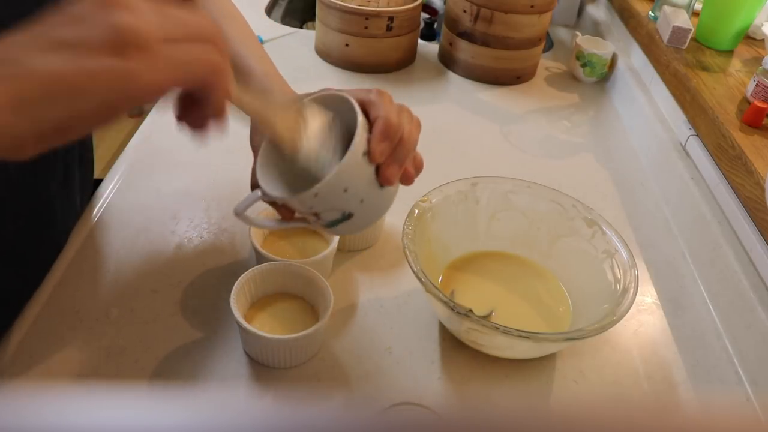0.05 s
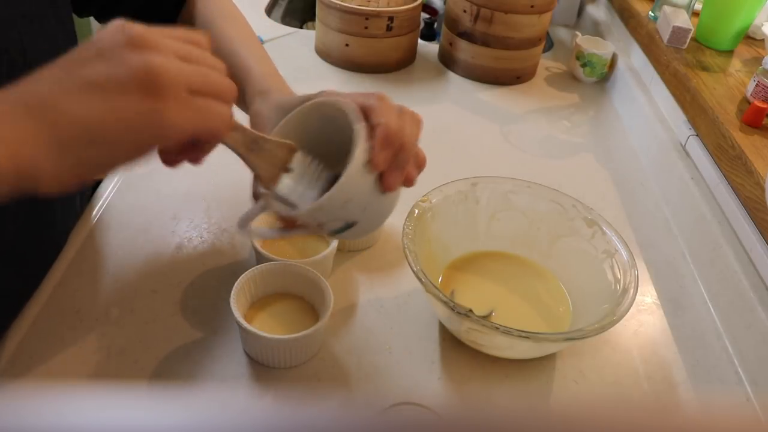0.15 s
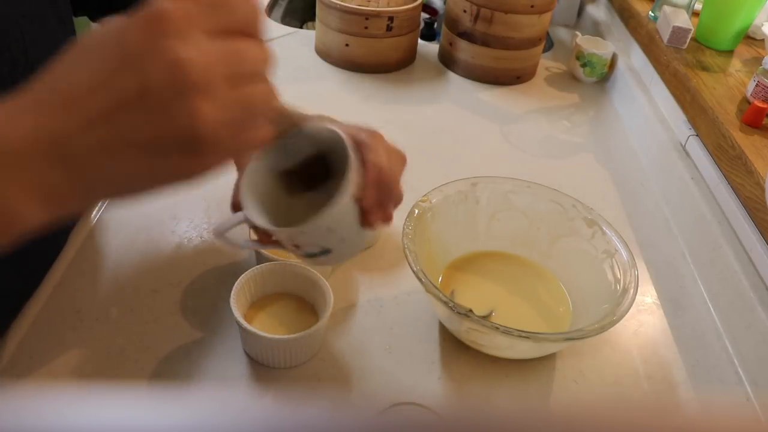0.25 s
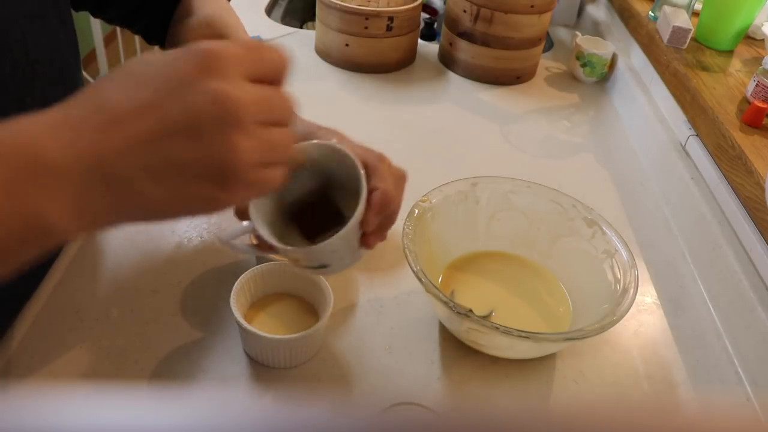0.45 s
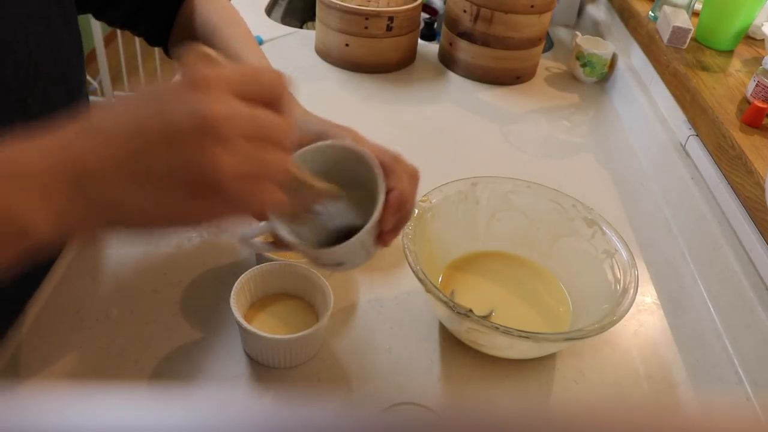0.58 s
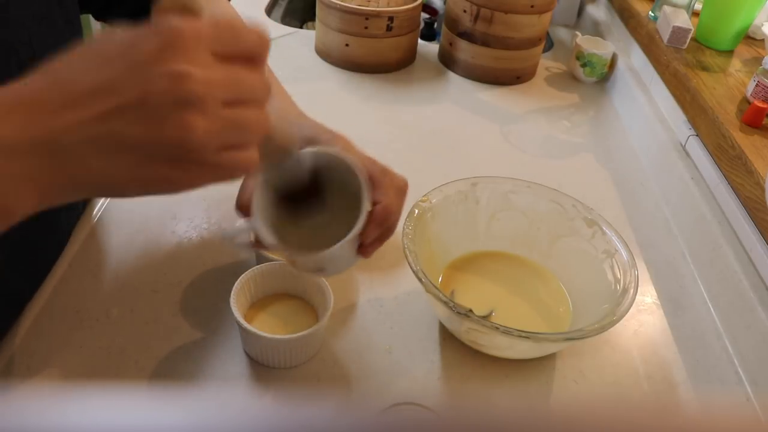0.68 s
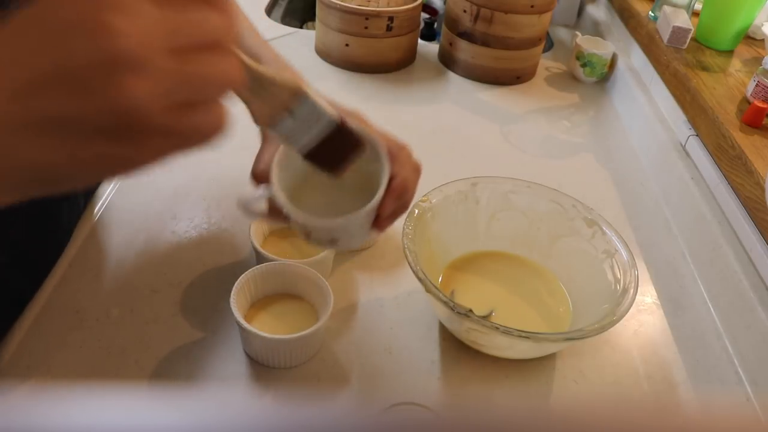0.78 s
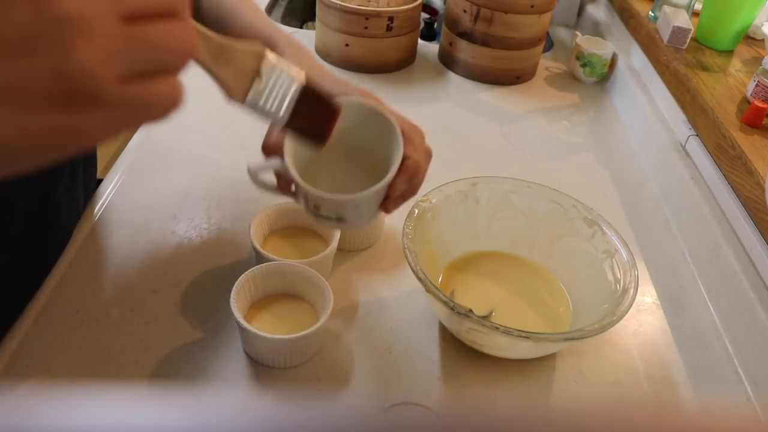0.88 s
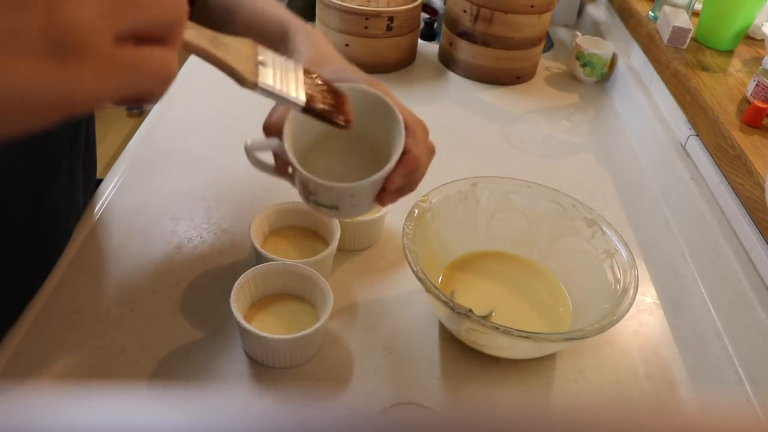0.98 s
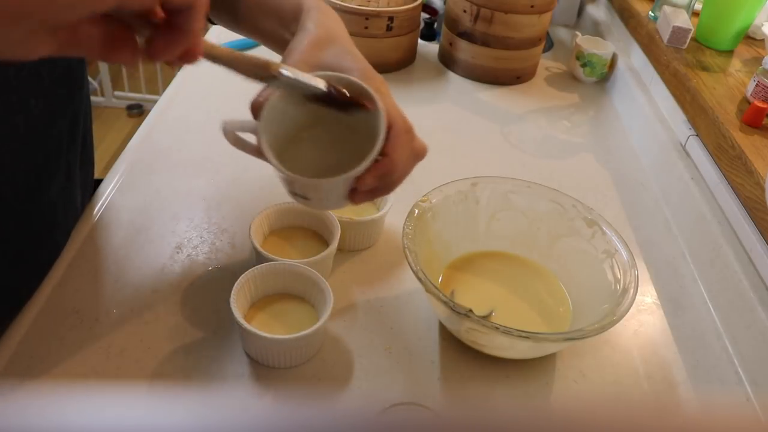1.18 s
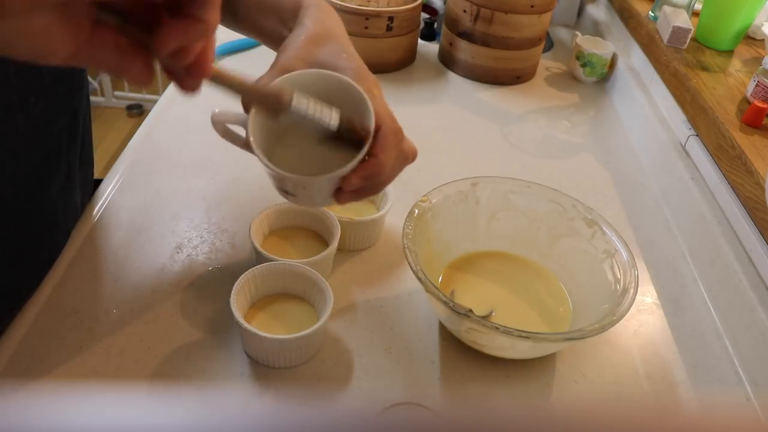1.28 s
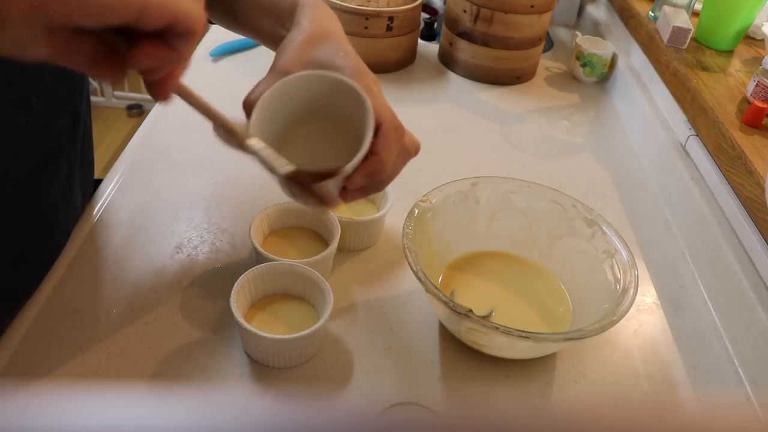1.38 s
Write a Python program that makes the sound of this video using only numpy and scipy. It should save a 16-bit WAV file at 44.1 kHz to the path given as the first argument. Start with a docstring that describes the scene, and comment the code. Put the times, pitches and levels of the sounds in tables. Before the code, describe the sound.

Brisk hard clinks and bristly scrapes of a brush stirred around a hand-held ceramic mug

```python
"""A faint hum and hiss in a quiet kitchen, then a pastry brush working round inside a hand-held mug.
Its metal ferrule knocks the ceramic wall several times; the bristles scratch between the knocks.
Both excite one bank of damped modes; knocks add a noise crack, and a low thump as the hardest
overload the recorder. Feedback delays give the room's brief answer; puffs of bright noise rustle
as the brush lifts away."""
import sys
import numpy as np
from scipy import signal
from scipy.fft import rfft, irfft, next_fast_len
from scipy.io import wavfile

SR = 44100
rng = np.random.default_rng(int(sys.argv[2]) if len(sys.argv) > 2 else 0)


def log_audio(samples):
    """Write samples as a 16-bit WAV file to the path given in sys.argv[1]."""
    # one column per channel
    frames = np.atleast_2d(samples).T
    # limit to full scale, then quantise
    limited = np.clip(frames, -1, 1)
    pcm = np.round(limited * 32767).astype(np.int16)
    wavfile.write(sys.argv[1], SR, pcm)


N = 63945


def amp(db):
    """Decibel law: a level becomes an amplitude ratio."""
    return 10 ** (np.asarray(db) / 20)


def rms_one(x):
    """Power normalization: scale to unit root mean square."""
    return x / np.sqrt(np.mean(x ** 2) + 1e-20)


def at_hz(points, hz):
    """Spectral interpolation along a logarithmic frequency axis."""
    point_hz, value = np.array(points).T
    return np.interp(np.log(hz), np.log(point_hz), value)


def band(x, low_hz, high_hz):
    """Band-pass filtering with Butterworth slopes."""
    edges_hz = [low_hz, min(high_hz, .45 * SR)]
    return signal.sosfilt(signal.butter(2, edges_hz, "band", fs=SR, output="sos"), x)


def drift(rate_hz):
    """Low-passed noise: a slow random fluctuation of unit spread."""
    r = np.exp(-2 * np.pi * rate_hz / SR)
    noise = rng.standard_normal(N + SR)
    return rms_one(signal.lfilter([1], [1, -2 * r, r * r], noise)[SR:])


def sides(db):
    """Level stereophony: left and right gains for a level difference."""
    return amp(np.array([db, -db]) / 2)


FLOOR_DB = -52  # rms level of the noise floor
RUMBLE_SWING_DB, RUMBLE_TOP_HZ = 2.5, 150  # the bass comes in lumps
# noise floor spectrum: pitch_hz [Hz], level_db [relative dB per Hz]
FLOOR = [(15, -22.5), (30, -2.5), (62, -0.5), (100, -6.5), (200, -12), (400, -10), (900, -17), (2500, -20),
         (4800, -25), (6800, -24), (10000, -19.5), (14000, -34), (16000, -30.5)]
# left-right likeness of the noise: pitch_hz [Hz], likeness [0 to 1]
LIKENESS = [(30, .9), (120, 0.51), (400, 0.75), (1500, .15), (5000, .02)]
# hum partials: pitch_hz [Hz], level_db [dB, before a common lift and wavering]
HUM = [(118.4, -61.5), (177.6, -64), (349.9, -69.5)]


def room_tone():
    """Partial coherence: half-octave noise bands mix mid and side; sine partials waver as hum."""
    noise = 0
    edges_hz = 20 * 2 ** np.arange(0, 10.1, .5)
    lumps = drift(11)
    white = rng.standard_normal((2, 2, N + SR))
    for k, (low_hz, high_hz) in enumerate(zip(edges_hz, edges_hz[1:])):
        mid, side = band(white[k % 2], low_hz, high_hz)[:, SR:]
        hz = np.sqrt(low_hz * high_hz)
        alike = np.clip(at_hz(LIKENESS, hz), 0, 1)
        level_db = at_hz(FLOOR, hz) + 0.701 * drift(8)
        level_db = level_db + RUMBLE_SWING_DB * (hz < RUMBLE_TOP_HZ) * lumps
        stereo = np.sqrt(1 + alike) * mid + np.sqrt(1 - alike) * side * [[1], [-1]]
        noise = noise + amp(level_db) * stereo
    hum = 0
    for hz, level_db in HUM:
        cycles = hz * np.arange(N) / SR + rng.random()
        hum = hum + amp(level_db + 0.5 + 2.5 * drift(3.2)) * np.sin(2 * np.pi * cycles)
    return amp(FLOOR_DB) * rms_one(noise) + hum


ROOM_DB, ROOM_T60_S, WALL_CUT_HZ = -22.5, 0.37, 7300


def kitchen(x):
    """Reverberation by recirculation: sixteen feedback delays a side, duller on every round."""
    size = next_fast_len(N + SR)
    one_sample = np.exp(-2j * np.pi * np.arange(size // 2 + 1) / size)
    pole = np.exp(-2 * np.pi * WALL_CUT_HZ / SR)
    dulling = (1 - pole) / (1 - pole * one_sample)
    response = np.zeros((2, len(one_sample)), complex)
    lags = (rng.uniform(.004, .035, size=32) * SR).astype(int)
    for k, lag in enumerate(lags):
        loop = amp(-60 * lag / SR / ROOM_T60_S) * dulling * one_sample ** lag
        # the closed loop sums all its rounds; signs alternate between delays
        response[k % 2] += loop / (1 - loop) * (-1) ** (k // 2)
    return irfft(response * rfft(x.mean(axis=0), size), size)[:, :N]


# faint rustles as the brush lifts away:
# start_s [s], level_db [dB at onset], t60_s [s to fall 60 dB], pitch_hz [Hz, within the band]
RUSTLES = [(0.855, -53.5, .15, 6300), (1.013, -47.5, .15, 8410), (1.011, -49.5, 0.15, 13600),
           (1.07, -59, .25, 8300)]


def rustles():
    """Exponential decay: short dying puffs of bright band-limited noise."""
    t, out = np.arange(N) / SR, 0
    for start_s, level_db, t60_s, hz in RUSTLES:
        envelope = amp(level_db - 60 * np.abs(t - start_s) / t60_s) * (t > start_s)
        puff = rms_one(band(rng.standard_normal((2, N)), hz / 1.53, hz * 1.3))
        out = out + envelope * puff
    return out


# bristles on the wall: start_s [s], then level_db [dB] in each zone of modes:
# cavity, low wall, flank, main ring, upper wall, top
SCRATCH = [(.10,-89,-82,-88,-95,-83.5,-79.5),(.135,-51,-72.5,-60,-47.5,-60.5,-51),(.19,-57,-71,-57.5,-49.5,-70.5,-63),(.21,-51,-41,-38,-50,-62,-52),
           (.245,-61.5,-46,-45,-47,-57,-53),(.27,-63,-57,-36,-50,-52,-50),(.30,-67.5,-59.5,-42.5,-33,-50.5,-39.5),(.36,-63.5,-62,-50,-41.5,-48,-53.5),
           (.40,-59.5,-51,-56,-46.5,-53.5,-51.5),(.42,-49.5,-51,-49,-37.5,-54,-47),(.455,-38,-61,-43,-38.5,-62.5,-50),(.49,-54,-40.5,-42.5,-33.5,-57.5,-55.5),
           (.52,-59.5,-50,-37,-36.5,-52,-57),(.56,-69,-56,-51,-47,-69,-48),(.61,-62,-62.5,-56.5,-39.5,-58.5,-47.5),(.64,-43.5,-42.5,-51,-46.5,-56.5,-42.5),
           (0.671,-56,-47.5,-65.5,-44,-64,-52),(0.693,-40,-37.5,-42,-26.5,-64,-47),(.71,-60.5,-54.5,-43,-45,-56,-50.5),(0.751,-56.5,-56,-46.5,-35.5,-55.5,-53.5),
           (0.764,-58,-57,-64,-56,-69,-64),(.80,-66.5,-70,-69.5,-53.5,-80,-86),(.89,-73,-85,-93,-92,-104,-92)]
FLICKS_PER_S, FLICK_SPREAD_DB, CLUMP_DB, BRISTLE_HISS_DB = 9000, 2, 2.5, -12


def bristles():
    """Stochastic friction: dense random flicks in clumps, with rubbing strength for each zone."""
    start_s, *levels_db = np.transpose(SCRATCH)
    t = np.arange(N) / SR
    rub = [amp(np.interp(t, start_s, level_db)) for level_db in levels_db]
    hits = rng.random(N) < FLICKS_PER_S / SR
    flicks = hits * amp(FLICK_SPREAD_DB * np.minimum(rng.exponential(1, N), 4))
    flicks = rms_one(flicks * amp(CLUMP_DB * drift(50)))
    upper_wall = rub[-2]
    rough = flicks * upper_wall * amp(BRISTLE_HISS_DB) * rng.standard_normal((2, N))
    return flicks, rub, band(rough, 3500, 11000)


# ferrule knocks: start_s [s], slide_ms [ms of sliding contact], then level_db [dB] in each zone:
# cavity, low wall, flank, main ring, upper wall, top; crack_db [dB], thump_db [dB], side_db [dB left-right]
KNOCKS = [(.1352,.15,-28,-25,-23.5,-24,-49.5,-62,-54,-70,-2.5),(0.2056,.2,-22.5,-14,-17,-19,-28.5,-23.5,-20.5,-70,-3),
          (0.2784,.1,-31,-11,-9.5,-16.5,-4.5,-9.5,-6,-10,6),(.4108,.1,-7.5,-7.5,-14,-7,-19,-15,1.5,-12.5,-1),
          (0.468,.3,-43,-45,-43,-17.5,-35.5,-22,-52,-73,1.5),(0.4706,5,-35.5,-40,-32,-13,-44.5,-27,-79,-72,-3),
          (.5287,.1,-30.5,-16,-11.5,-5.5,-11,-13,-2.5,-12.5,-4),(.5575,10,-63.5,-53,-50,-21.5,-53.5,-42,-76,-75,-10),
          (0.6162,.1,-9.5,-14,-20.5,-7,-13,-16.5,-1.5,-27,-2),(0.683,5,-40,-48,-23,-25.5,-34,-25,-45,-70,-1),
          (0.7187,.3,-59,-30,-56,-26.5,-36,-44,-36,-70,-4),(0.7339,2,-63,-34,-52,-49,-61,-37,-52,-70,-8),
          (1.4315,.15,-29.5,-43,-37.5,-28.5,-44,-39.5,-33,-29,-1.5)]
CRACK_TOP_HZ, CRACK_T60_S, THUMP_HZ = 7000, .005, 1300


def contact():
    """Impulse excitation: short bright cracks, and a low thump as the hardest knocks overload the recorder."""
    cracks, thumps = np.zeros((2, N))
    for start_s, *_, crack_db, thump_db, side_db in KNOCKS:
        start = int(start_s * SR)
        cracks[start], thumps[start] = amp(crack_db), amp(thump_db)
    fade = signal.lfilter([1], [1, -amp(-60 / (CRACK_T60_S * SR))], cracks)
    noise = rng.standard_normal(N) + 0.37 * rng.standard_normal((2, N))  # mostly common to both sides
    crack = band(band(fade * noise, 740, CRACK_TOP_HZ), 600, 15000)
    thump = band(thumps, 40, THUMP_HZ) * SR / (2 * np.pi * THUMP_HZ)
    return crack, thump


def ring(drive, hz, t60_s, pan_db, lead_rad):
    """Damped resonance: a complex one-pole mode heard at two ports, each with its level and phase."""
    pole = amp(-60 / (t60_s * SR)) * np.exp(2j * np.pi * hz / SR)
    turns = signal.lfilter([1], [1, -pole], drive + 1e-18)
    ports = sides(pan_db) * np.exp(.5j * lead_rad * np.array([1, -1]))
    return (turns * ports[:, None]).imag


# upper limits of the zones of modes [Hz]; the last zone is open above
ZONE_TOPS_HZ = [1800, 2600, 3050, 4000, 8000]
# mug modes: pitch_hz [Hz], level_db [dB], t60_s [s], pan_db [dB left-right], lead_rad [rad, left leads]
MUG = [(1008,-6,0.0071,-0.5,0.33),(1216,0,.02,0.5,.1),(1398,-1.5,0.018,-0.5,-0.35),(1540,-4.5,0.011,-1,-.3),(1800,-4,.006,-2.5,-0.66),(2297,-0.5,0.011,-2.5,1.2),(2640,-5,0.014,-2,.2),
       (2936,0.5,0.019,-3,.2),(3139,-6,0.026,-5,-0.14),(3207,0,0.03,-5,-0.069),(3410,-10.5,.022,-2.5,.3),(3625,-10,0.022,0,.5),(4475,-4,0.0075,-0.5,0.19),(5680,0.5,0.0096,0,-0.19),
       (6500,0.5,0.0051,3.5,.4),(6910,-4.5,.024,-1.5,.4),(7760,-7.5,.006,-1.5,.6),(8660,-4.5,.014,-0.5,.8),(9088,1,.022,-2,1.2),(10100,-9.5,.01,3,1.3),(10660,-10.5,0.0087,-3.5,1.4),(12100,-12.5,.006,0.5,0.22)]
RING_SPREAD_DB, MUG_LOW_CUT_HZ = 1.2, 780


def mug():
    """Modal superposition: knocks and flicks drive the same modes; a sliding knock swells its ring."""
    chance = rng.standard_normal((len(KNOCKS), len(MUG)))
    flicks, rub, out = bristles()  # out begins as the bristle hiss
    for k, (hz, level_db, t60_s, pan_db, lead_rad) in enumerate(MUG):
        zone = np.searchsorted(ZONE_TOPS_HZ, hz)
        # equal steady loudness whatever the damping
        damping_gain = np.sqrt(4 * np.log(1000) / (t60_s * SR))
        scratch = flicks * rng.standard_normal(N) * rub[zone] * damping_gain
        drive = scratch * np.ones((2, 1), complex)
        for (start_s, slide_ms, *levels_db, side_db), luck in zip(KNOCKS, chance[:, k]):
            n = np.arange(max(int(slide_ms * SR / 1000), 1))
            strength = (-1) ** k * amp(levels_db[zone] + RING_SPREAD_DB * luck)
            # the push turns in step with the mode, so the ring builds up
            push = strength * np.exp(2j * np.pi * hz * n / SR) / len(n)
            drive[:, int(start_s * SR) + n] += push * sides(side_db)[:, None]
        out += amp(level_db) * ring(drive, hz, t60_s, pan_db, lead_rad)
    return signal.sosfilt(signal.butter(4, MUG_LOW_CUT_HZ, "high", fs=SR, output="sos"), out)


def scene():
    """Linear superposition of the background, the room's answer, the mug and the thumps."""
    crack, thump = contact()
    near = mug() + crack
    return near + thump + amp(ROOM_DB) * kitchen(near) + rustles() + room_tone()


CEILING, CUTOFF_HZ = 1.0, 16700


def record(dry):
    """Amplitude and band limiting: peaks clip at the ceiling, then a steep low-pass cuts the top."""
    clipped = np.clip(dry, -CEILING, CEILING)
    return signal.sosfilt(signal.cheby2(14, 70, CUTOFF_HZ, fs=SR, output="sos"), clipped)


dry = scene()
out = record(dry)
log_audio(out)
```